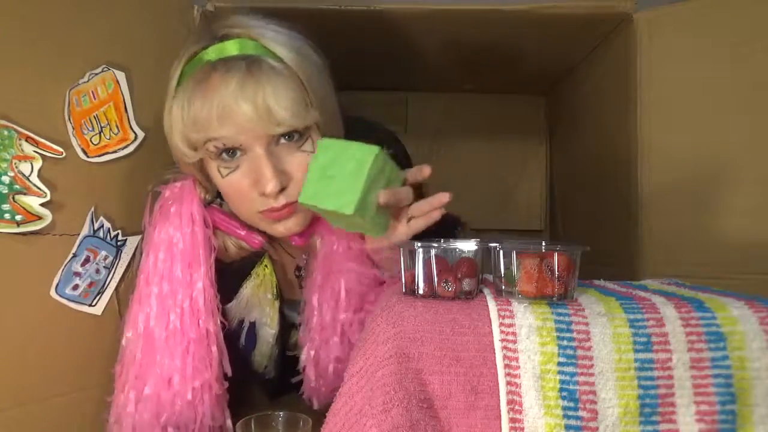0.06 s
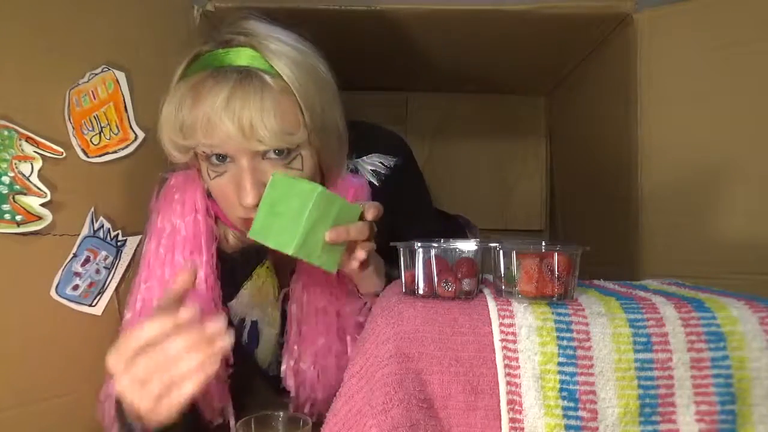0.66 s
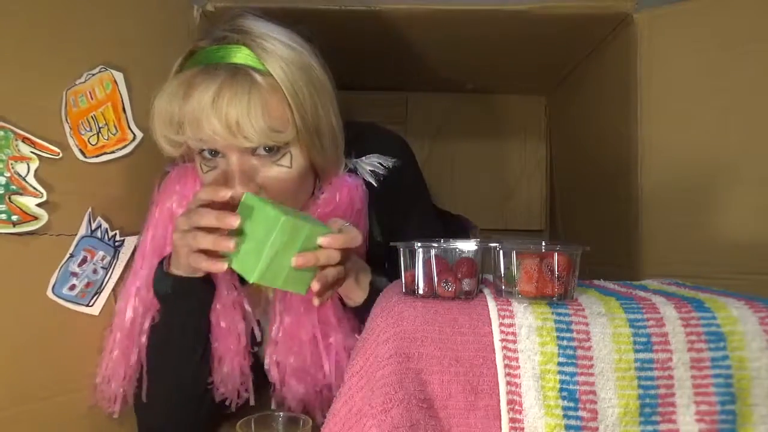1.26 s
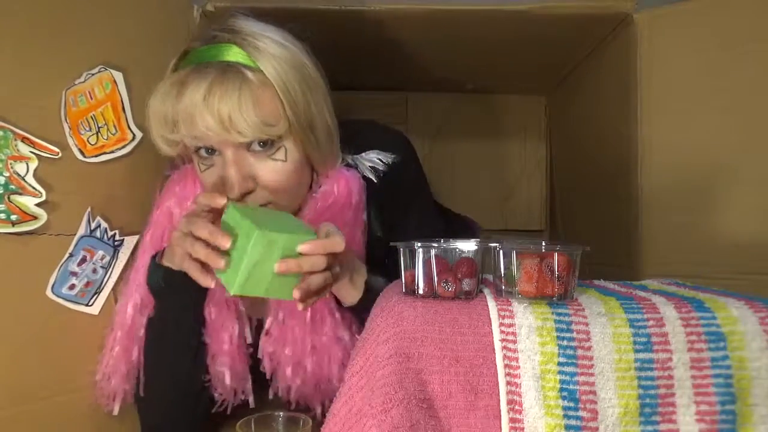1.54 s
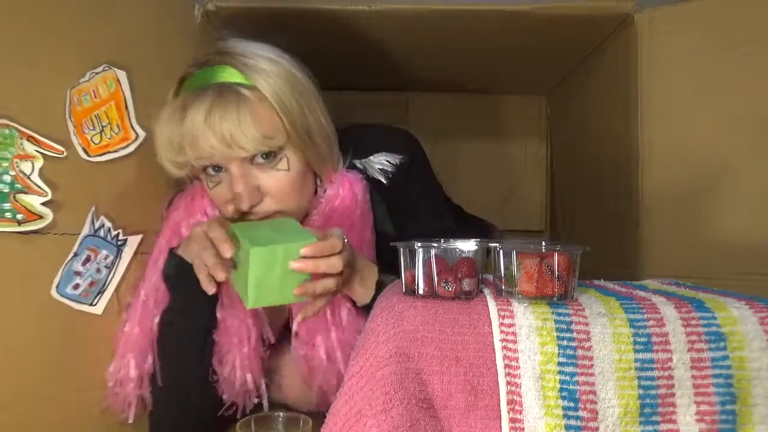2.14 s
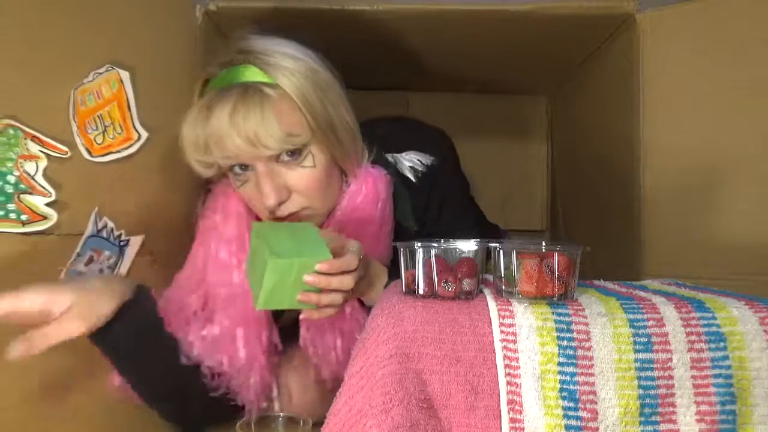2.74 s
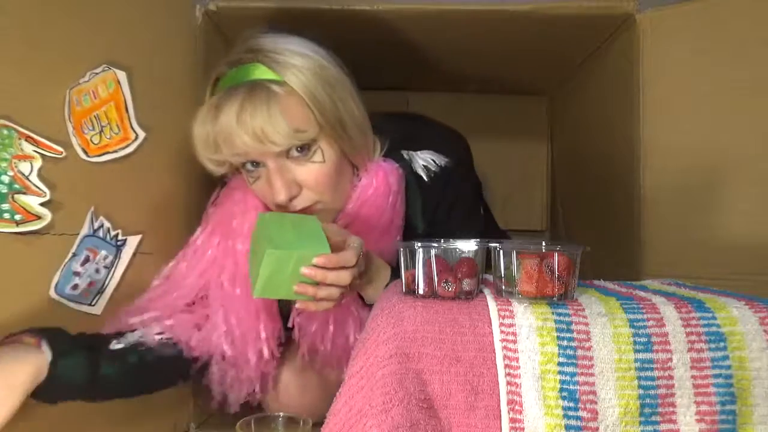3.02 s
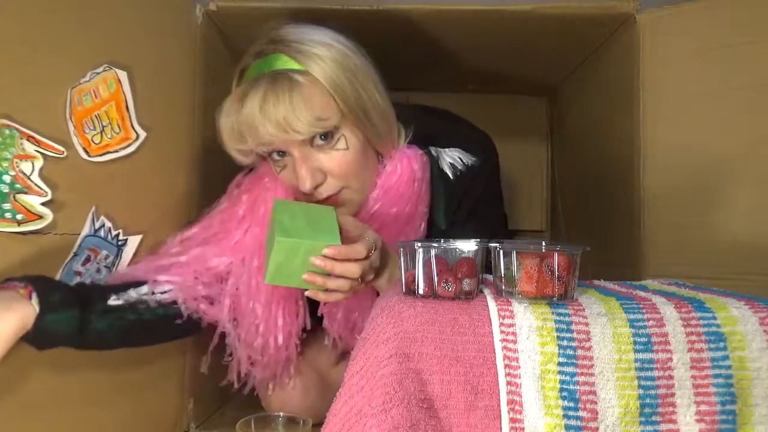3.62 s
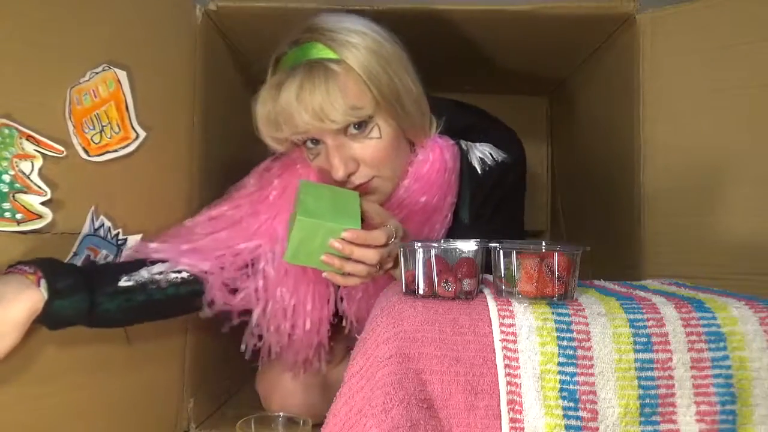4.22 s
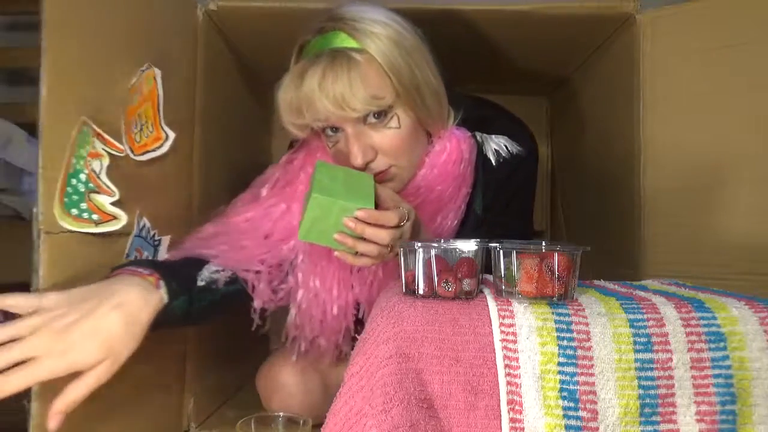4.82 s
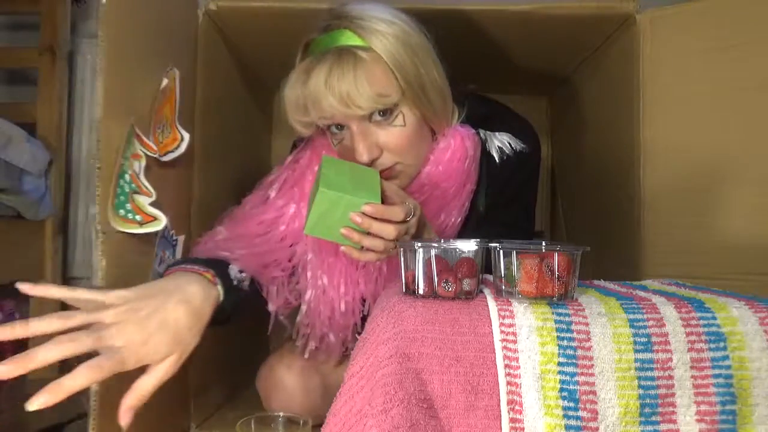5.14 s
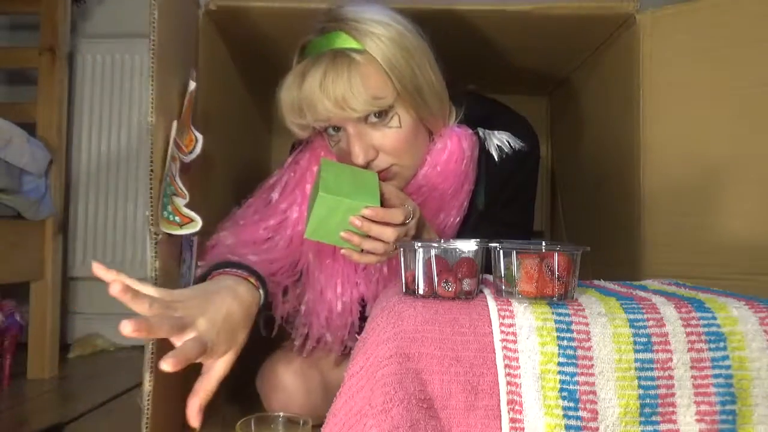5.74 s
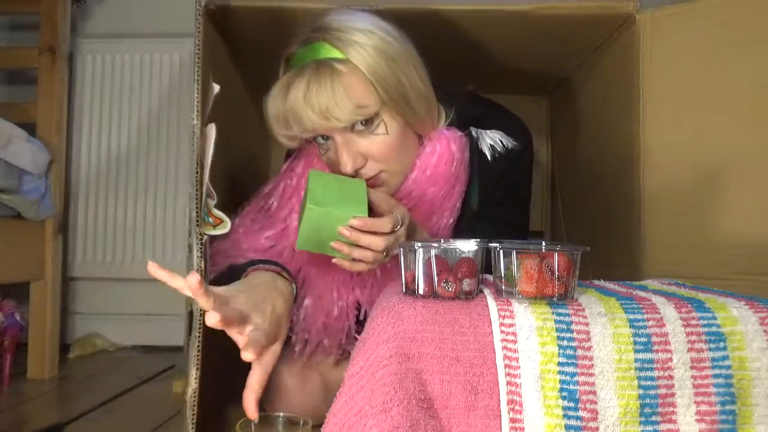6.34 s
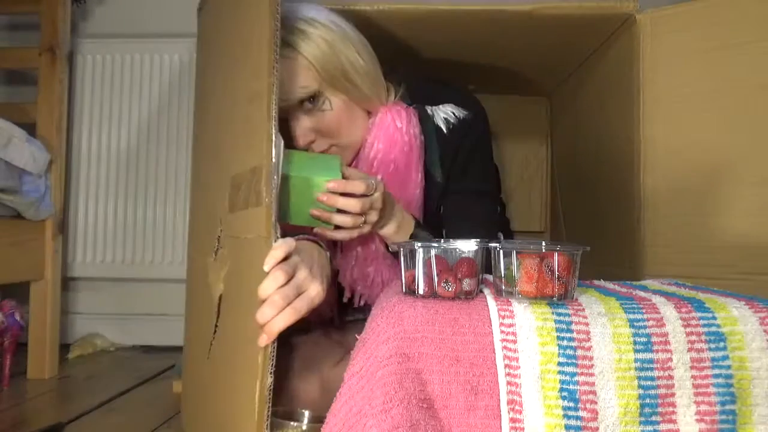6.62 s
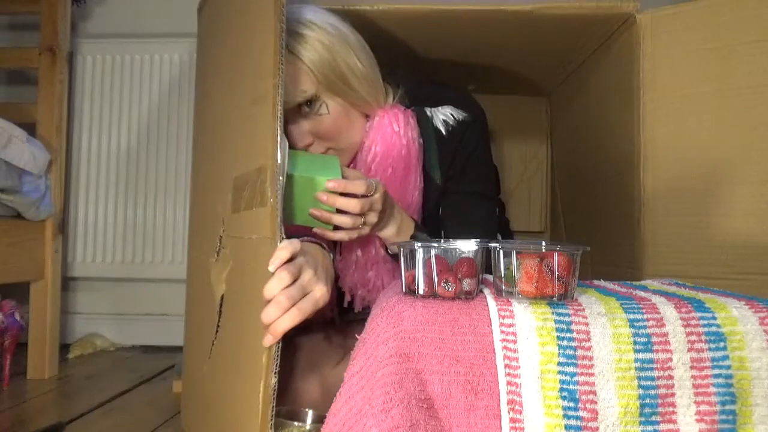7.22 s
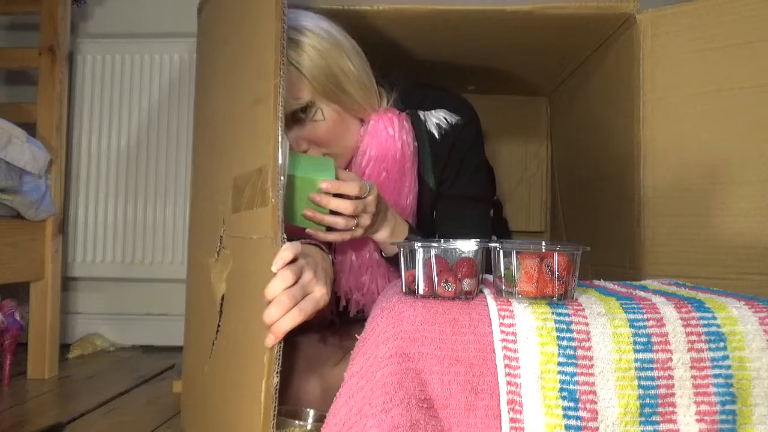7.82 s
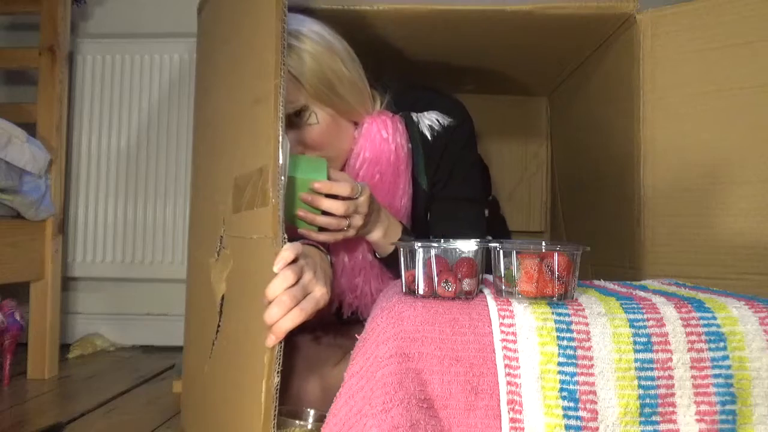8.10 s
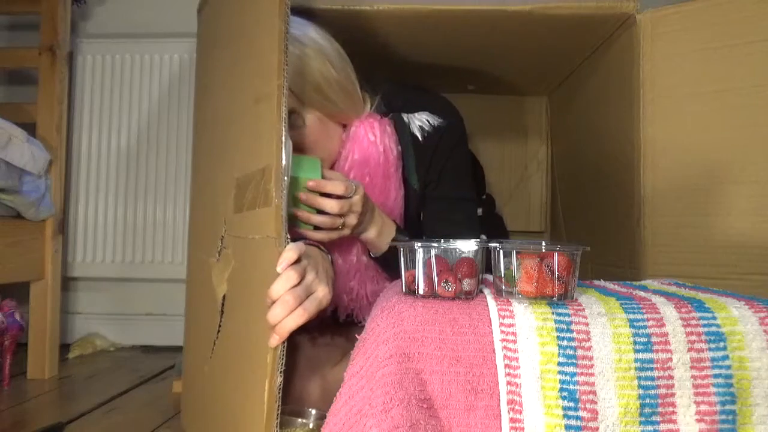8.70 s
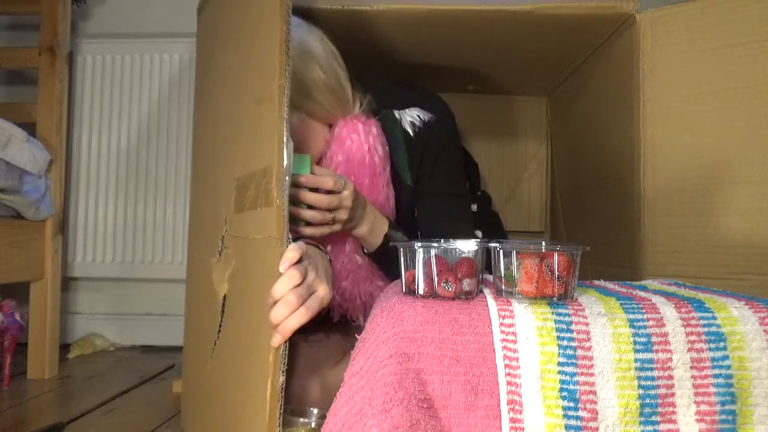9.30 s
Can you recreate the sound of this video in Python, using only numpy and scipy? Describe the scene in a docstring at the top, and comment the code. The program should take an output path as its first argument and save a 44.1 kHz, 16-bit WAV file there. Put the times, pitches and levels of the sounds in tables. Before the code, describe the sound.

A boa of thin plastic streamers rustles and crinkles as someone shifts inside a big cardboard box. The rustle builds into a cluster of hollow knocks, dull rubbing and sharp clicks, then eases. A cardboard flap scrapes and snaps as it is pulled closed. Faint crinkles and ticks follow, and a soft hissing brush comes at the end. The microphones are close, in a small quiet room.

```python
"""A boa of thin plastic streamers, worn by someone shifting about inside a big cardboard box.
The strips slide and crinkle over each other, creases and fingernails snap, limbs bump the walls
and set them ringing, and the flap scrapes as it is pulled closed. Heard close on a pair of
microphones: quick reflections off the box, then the short tail and faint air of a small quiet room.
The sound drops out for an instant at about 6.6 s."""
import sys
import numpy as np
from scipy import signal
from scipy.fft import rfft, irfft
from scipy.io import wavfile
from scipy.ndimage import uniform_filter1d

SR = 44100
rng = np.random.default_rng(int(sys.argv[2]) if len(sys.argv) > 2 else 0)


def store_pcm(level_fs):
    """Save levels as 16-bit WAV."""
    pcm = np.round(np.clip(level_fs, -1, 1) * 32767).astype(np.int16)
    wavfile.write(sys.argv[1], SR, np.atleast_2d(pcm).T)


N = 421596
TIME = np.arange(N) / SR

# Levels in the tables are relative, ahead of each source's own gain and the box.
# how much the whole boa is on the move: t/s, level/dB
MOVEMENT = [(0, -56), (.65, -55), (1.1, -51), (1.52, -48), (2.2, -34.5), (2.5, -41), (2.85, -45),
            (3.35, -48.5), (4.3, -50.5), (4.5, -57), (4.9, -62.5), (5.8, -62.5), (6.3, -65.5),
            (7.45, -73.5), (8.5, -75.5), (9.25, -56), (9.56, -56.5)]
# single tugs on the boa: peak t/s, rise/s, fall/s, fizz level/dB, swish level/dB
TUGS = [(.18, 0.25, 0.19, -53, -57.5), (.41, 0.091, .08, -51, -55), (1.23, 0.31, 0.12, -45, -50),
        (1.72, 0.1, 0.076, -48, -49.5), (2.66, 0.083, .08, -39.5, -48), (3.0, .17, 0.14, -41, -51),
        (3.18, 0.13, 0.087, -44, -51.5), (3.66, 0.18, 0.14, -46, -52.5), (4.66, 0.09, 0.14, -59, -64.5),
        (5.5, 0.2, .1, -56.5, -61), (5.94, 0.046, 0.035, -52, -60.5), (6.13, 0.1, 0.07, -58, -67),
        (6.39, 0.033, 0.095, -56, -60), (6.52, 0.11, 0.14, -60.5, -63.5), (6.98, .08, 0.067, -63, -67),
        (7.24, 0.18, .08, -70, -69), (7.69, 0.083, 0.2, -62.5, -67), (8.32, 0.15, 0.12, -66, -71)]
# a sleeve brushes along the strips: peak t/s, rise/s, fall/s, level/dB
BRUSHES = [(.4, 0.047, 0.035, -52), (9.5, 0.72, .5, -51.5)]
# the body leans on the walls: peak t/s, rise/s, fall/s, level/dB
LEANS = [(.08, .2, 0.35, -63.5), (2.23, 0.52, 0.42, -46.5), (5.19, 0.067, 0.093, -56),
         (9.27, 0.28, 0.054, -64)]
# spectra of loose strips, sliding bundle, sleeve and rubbed wall: f/Hz, level/dB
FIZZ_SPECTRUM = [(1500, -39.5), (4000, -27.5), (5800, -13), (7400, -6.5), (8700, -1.5), (9600, -2.5),
                 (11000, -14)]
SWISH_SPECTRUM = [(100, -32), (500, -15), (1300, -7.5), (2200, -3.5), (3400, -0.5), (4500, -1), (5800, -3),
                  (7500, -7), (11000, -18.5)]
BRUSH_SPECTRUM = [(1000, -25), (3000, -15), (4600, -6), (6300, -2), (7800, 1), (9500, 0), (11000, -9.5)]
RUB_SPECTRUM = [(30, -21), (60, -16.5), (130, -13), (250, -5), (370, -2), (520, -2), (700, 0), (950, -1),
                (1500, -3), (2200, 0), (3500, -5.5), (8000, -44)]
# spectrum of the still room: f/Hz, level/dB
AIR_SPECTRUM = [(15, -55), (25, -20), (54, -20), (96, -5.5), (192, -5), (401, -3), (907, 0.5), (1260, -3),
                (1900, -5.5), (2050, -5.5), (4630, -11), (8970, -10), (11000, -15), (14300, -48),
                (22000, -120)]
# how alike that air is at the two microphones: f/Hz, correlation
AIR_LIKENESS = [(60, 0.35), (130, 0.83), (270, 0.51), (580, 0.08), (1220, 0.048), (2600, 0.13),
                (5520, 0.64), (11700, 0.78)]
# decay of the room: f/Hz, T60/s
ROOM_T60 = [(120, 0.48), (400, 0.22), (1000, 0.27), (3000, 0.3), (10000, 0.099)]
# snaps of creases and fingernails: t/s, tick level/dB, clack level/dB
SNAPS = [(2.171, -28, -33), (2.3559, -26.5, -31), (2.469, -31, -44), (2.6398, -28, -44),
         (2.6659, -27.5, -46), (3.1833, -34.5, -57), (3.244, -34, -52), (3.2721, -56, -39.5),
         (3.6798, -31.5, -44), (5.127, -35, -51), (5.1705, -23.5, -28.5), (5.1777, -30.5, -44),
         (5.5607, -39.5, -44), (6.0883, -43.5, -58), (6.1864, -45, -56), (6.3945, -33, -48),
         (7.011, -50, -59), (7.1557, -35.5, -40.5), (7.2369, -56, -54.5), (7.2720, -46, -59.5),
         (7.6857, -46.5, -60), (7.7159, -46.5, -54), (8.177, -51.5, -59), (8.5610, -52, -63),
         (8.934, -48.5, -70)]
# spectra of the bright tick and of the dull clack behind it: f/Hz, level/dB
TICK_SPECTRUM = [(300, -18), (1500, -12.5), (3200, -13.5), (4400, -2.5), (6500, -3), (8600, 7), (11000, -7)]
CLACK_SPECTRUM = [(40, -30), (150, -12.5), (600, -5.5), (1400, -3), (2400, 2), (3600, 1), (5500, -11),
                  (11000, -27)]
# limbs against the walls: t/s, level/dB, lowest f/Hz of the spot, highest f/Hz of the blow, rebounds
BUMPS = [(0.507, -45, 453, 3040, 0), (0.559, -44.5, 650, 2200, 0), (0.735, -52.5, 150, 800, 1),
         (1.917, -21, 333, 1190, 2), (2.170, -22, 416, 1300, 1), (2.284, -31, 149, 417, 0),
         (2.354, -19.5, 670, 970, 0), (2.452, -29.5, 281, 910, 0), (2.707, -27, 140, 1390, 0),
         (3.680, -42.5, 217, 1182, 0), (3.992, -45, 190, 700, 0), (4.306, -40.5, 160, 794, 0),
         (5.130, -42, 200, 1300, 0), (5.179, -39.5, 130, 1130, 0), (5.563, -49.5, 500, 2620, 0),
         (7.01, -54.5, 400, 1810, 0), (7.156, -48.5, 200, 2540, 0), (9.272, -53, 160, 805, 0)]
# modes of the cardboard: f/Hz, level/dB, T60/s
CARDBOARD_MODES = [(119.5, -13, 0.17), (201, -7, 0.11), (276, -17, 0.11), (382.6, -3.5, 0.079),
                   (490, 1, 0.021), (594, -11, 0.046), (672, -4.5, 0.043), (796, -20, .04),
                   (960, -12, 0.019), (1250, 2.5, 0.018), (1440, -1, 0.026), (1540, -1, 0.035),
                   (1990, 5.5, 0.028)]
# skin and sleeves drag on the cardboard and its flap: peak t/s, rise/s, fall/s, level/dB
SCRAPES = [(3.998, .005, 0.036, -53), (4.31, .004, 0.052, -45.5), (5.107, .006, .05, -48),
           (5.129, 0.0055, .035, -36.5), (5.17, 0.034, 0.037, -33.5), (5.29, 0.074, 0.055, -41.5),
           (5.46, 0.17, 0.033, -49), (6.15, 0.078, 0.077, -49.5), (8.34, 0.094, 0.052, -59)]
# spectrum of dragged cardboard: f/Hz, level/dB
SCRAPE_SPECTRUM = [(47, -37), (80, -16), (254, -9.5), (416, -9), (1010, -2.5), (1140, -4.5), (1520, 1),
                   (1990, -3), (2440, 0.5), (5240, -5), (8770, 1), (11000, -8), (14300, -29), (22000, -120)]


def gain_of(db):
    """Decibels to amplitude."""
    return 10 ** (np.asarray(db) / 20)


def unit_rms(x):
    """Scales to rms 1."""
    return x / np.sqrt(np.mean(x ** 2) + 1e-20)


def read(points, hz):
    """Reads a table on a log-frequency axis."""
    f, value = np.transpose(points)
    return np.interp(np.log(hz + 1), np.log(f + 1), value)


def add(mix, s, sound):
    """Mixes a sound in at time s."""
    part = mix[..., round(s * SR):][..., :sound.shape[-1]]
    part += sound[..., :part.shape[-1]]


def coloured(x, spectrum, size=2048):
    """Causal filter of energy 1 with the given spectrum, so that attacks stay sharp."""
    hz = abs(np.fft.fftfreq(size, 1 / SR))
    log_gain = np.log(gain_of(np.maximum(read(spectrum, hz), -100)))
    taps = np.fft.ifft(np.exp(np.conj(signal.hilbert(log_gain)))).real
    return signal.oaconvolve(x, taps / np.linalg.norm(taps))[:len(x)]


def wander(per_s):
    """A random drift of rms 1 that turns about per_s times a second."""
    points = rng.standard_normal(8192)
    return unit_rms(np.interp(TIME * per_s, np.arange(len(points)), points))


def burst(x):
    """Scales a hit to the energy of 4 ms at level 1."""
    return x * np.sqrt(.004 * SR / np.sum(x ** 2))


def strokes(rows, drop_db=10, roundness=1.92):
    """Gain of strokes that swell and fade, drop_db down one rise before and one fall after the peak."""
    power = np.zeros(N)
    for peak_s, rise_s, fall_s, db in rows:
        away = np.maximum((peak_s - TIME) / rise_s, (TIME - peak_s) / fall_s)
        near = away < 5
        power[near] += gain_of(db - drop_db * abs(away[near]) ** roundness) ** 2
    return np.sqrt(power)


def friction(spectrum, per_s, spread_db, clump_db, slide):
    """Tiny slips of random size, bunched in clumps, over the smooth noise of sliding."""
    size = gain_of(spread_db * np.minimum(rng.exponential(1, N), 5)) * rng.choice([-1, 1], N)
    slips = unit_rms(size * (rng.random(N) < per_s / SR))
    sliding = slide * rng.standard_normal(N)
    clumps = gain_of(clump_db * (wander(110) + wander(25)))
    return coloured(unit_rms((slips + sliding) * clumps), spectrum)


def in_box(x, left_db, walls_db, room_db, reflections=36):
    """What reaches the microphones: direct sound, echoes off the near walls, the room's short tail."""
    t = np.arange(SR // 2) / SR
    walls = np.zeros((2, len(t)))
    delay_s, sign = rng.uniform(.0015, .04, reflections), rng.choice([-1, 1], reflections)
    for microphone in walls:
        arrival_s = delay_s + rng.uniform(-.00015, .00015, reflections)
        microphone[(arrival_s * SR).astype(int)] = sign * np.exp(-delay_s / 0.015)
    hz, age, noise = signal.stft(rng.standard_normal((3, len(t))), SR, nperseg=256)
    apart = np.minimum(0.32 + hz / 1800, 1)[:, None]  # long waves reach both microphones alike
    diffuse = np.sqrt(1 - apart ** 2) * noise[:1] + apart * noise[1:]
    decay = gain_of(-60 * age / read(ROOM_T60, hz)[:, None])
    tail = signal.istft(diffuse * decay, SR, nperseg=256)[1][:, :len(t)] * np.minimum(t / 0.0048, 1)
    response = gain_of(walls_db) * walls / np.linalg.norm(walls[0])
    response += gain_of(room_db) * tail / np.linalg.norm(tail[0])
    response[:, 0] += gain_of([left_db / 2, -left_db / 2])  # direct sound
    return signal.oaconvolve(x[None], response, axes=1)[:, :N]


def spread_out(x, left_db, walls_db, room_db, places=3):
    """A wide source: the sound comes in turn from several places, each with its own reflections."""
    place = (TIME * 45 + wander(60)) % places
    gap = abs((place - np.arange(places)[:, None] + places / 2) % places - places / 2)
    shares = np.cos(np.pi / 2 * np.minimum(gap, 1)) ** 2
    return sum(in_box(x * share, left_db, walls_db, room_db) for share in shares)


def streamers(moving_db):
    """Just left of centre, strips fizz, the bundle swishes, a sleeve hisses; leaning adds a dull rub."""
    fizz_tugs = strokes([(*timing, db) for *timing, db, _ in TUGS])
    swish_tugs = strokes([(*timing, db) for *timing, _, db in TUGS])
    flutter = np.hypot(gain_of(-45 + moving_db), fizz_tugs)
    sliding = np.hypot(gain_of(-51.5 + 0.96 * moving_db), swish_tugs)
    pressing = np.hypot(gain_of(-59 + 0.67 * moving_db), strokes(LEANS))
    brushing = strokes(BRUSHES)
    fizz = friction(FIZZ_SPECTRUM, per_s=3500, spread_db=2, clump_db=1, slide=0.77) * flutter
    swish = friction(SWISH_SPECTRUM, per_s=4000, spread_db=2, clump_db=1.1, slide=0.73) * sliding
    brush = friction(BRUSH_SPECTRUM, per_s=3000, spread_db=3.5, clump_db=1.4, slide=0.89) * brushing
    rub = friction(RUB_SPECTRUM, per_s=2000, spread_db=3, clump_db=0.8, slide=1.16) * pressing
    return (gain_of(1.22) * spread_out(fizz + brush, left_db=2, walls_db=-7.5, room_db=-10.5)
            + gain_of(1.12) * spread_out(swish, left_db=2, walls_db=-8.5, room_db=-8)
            + gain_of(-0.75) * spread_out(rub, left_db=-0.5, walls_db=-10, room_db=-4))


def room_air(level_db=-63.5):
    """The faint steady noise of the room, partly shared by the two microphones."""
    hz = np.fft.rfftfreq(N, 1 / SR)
    left, unrelated = rfft(rng.standard_normal((2, N)))
    likeness = np.clip(read(AIR_LIKENESS, hz), -1, 1)
    right = likeness * left + np.sqrt(1 - likeness ** 2) * unrelated
    pair = np.array([left, right]) * gain_of(read(AIR_SPECTRUM, hz))
    return gain_of(level_db) * unit_rms(irfft(pair, N))


def stray_snaps(moving_db, per_s=9, spread_db=13):
    """Lesser creases pop at random, louder when the boa moves more; rows as in SNAPS."""
    at = np.flatnonzero(rng.random(N) < per_s / SR)
    tick_db = (-44 + 0.5 * moving_db - spread_db * rng.random(N))[at]
    return list(zip(TIME[at], tick_db, tick_db - 8))


def snaps(moving_db, neighbours=6):
    """A crease pops over in under a millisecond and jolts what lies behind it, amid smaller creases."""
    t, ticks, clacks = np.arange(SR // 40) / SR, np.zeros(N), np.zeros(N)
    for s, tick_db, clack_db in SNAPS + stray_snaps(moving_db):
        tick_noise, clack_noise = rng.standard_normal((2, len(t)))
        pop = burst(tick_noise * (np.exp(-t / 0.00044) + gain_of(-6) * np.exp(-t / 0.0027)))
        add(ticks, s, gain_of(tick_db) * pop)
        add(clacks, s, gain_of(clack_db) * burst(clack_noise * np.exp(-t / 0.0035)))
        for when, weakness in rng.random((neighbours, 2)):
            neighbour_db = min(tick_db - 8, -50) - 12 * weakness
            add(ticks, max(s - .025 + .08 * when, 0), gain_of(neighbour_db) * pop)
    pops = gain_of(1.43) * coloured(ticks, TICK_SPECTRUM) + gain_of(-1) * coloured(clacks, CLACK_SPECTRUM)
    return in_box(pops, left_db=2.4, walls_db=-14, room_db=-12)


def blows(rebound_s=0.05, first_rebound_db=-12):
    """Each bump and any weaker taps as the wall springs back: t/s, level/dB, low f/Hz, high f/Hz."""
    return [(s + k * rebound_s, db + first_rebound_db * np.sqrt(k), low_hz, high_hz)
            for s, db, low_hz, high_hz, rebounds in BUMPS for k in range(round(rebounds) + 1)]


def bumps():
    """Limbs ring three walls, just right of centre; the spot and the blow's softness pick the modes."""
    t, walls = np.arange(SR // 4) / SR, np.zeros((3, N))
    hz, db, t60 = np.transpose(CARDBOARD_MODES)[:, :, None]
    for k, (s, level_db, low_hz, high_hz) in enumerate(blows()):
        detune, phase = rng.uniform(-1, 1, (2, len(hz), 1))
        modes = np.sin(2 * np.pi * hz * (1 + 0.019 * detune) * t + np.pi * phase)
        ring = (gain_of(db - 60 * t / t60) * modes).sum(0)
        # the crowd of heavily damped modes: a hard first slap, then a short shudder
        slap = rng.standard_normal(len(t)) * (np.exp(-t / 0.0035) + gain_of(-8) * np.exp(-t / 0.033))
        band = np.vstack([signal.butter(2, low_hz, "high", fs=SR, output="sos"),
                          signal.butter(4, high_hz, fs=SR, output="sos")])
        thud = burst(signal.sosfilt(band, ring + gain_of(12.5) * slap))
        add(walls[k % len(walls)], s, gain_of(level_db) * thud)
    return gain_of(0.5) * sum(in_box(wall, left_db=-1.6, walls_db=-14.5, room_db=-13) for wall in walls)


def flap():
    """The cardboard sticks and slips as it is dragged, close by and a little to the left."""
    scrape = friction(SCRAPE_SPECTRUM, per_s=2400, spread_db=3, clump_db=3, slide=0.95) * strokes(SCRAPES)
    return gain_of(-1) * spread_out(scrape, left_db=2.5, walls_db=-5.5, room_db=-13)


def scene(brisk_db=-45):
    """All sources at the microphones; movement, in dB above a brisk one, drives rustle and stray snaps."""
    moving_db = np.interp(TIME, *np.transpose(MOVEMENT)) - brisk_db
    return streamers(moving_db) + flap() + bumps() + room_air() + snaps(moving_db)


def record(dry, dropout_s=(6.591, 6.631), cutoff_hz=11200):
    """Both channels drop out for an instant, and the top of the treble is cut off."""
    live = (TIME < dropout_s[0]) | (TIME > dropout_s[1])
    gate = uniform_filter1d(live.astype(float), size=64)
    low_pass = signal.firwin(501, cutoff_hz, window=("kaiser", 8), fs=SR)
    return signal.oaconvolve(dry * gate, low_pass[None], "same")


dry = scene()
out = record(dry)
store_pcm(out)
```